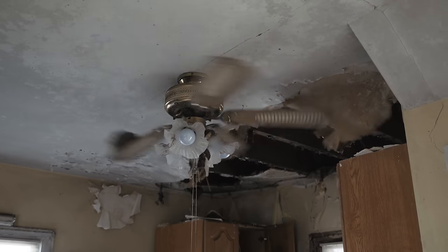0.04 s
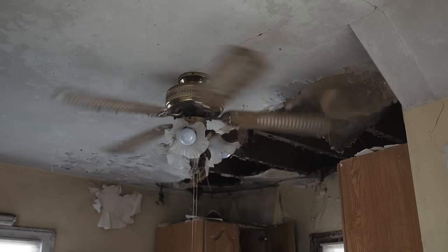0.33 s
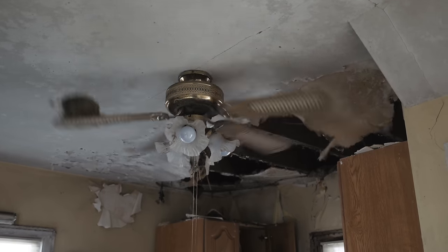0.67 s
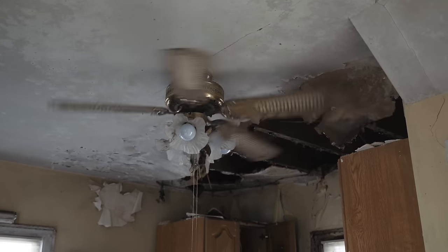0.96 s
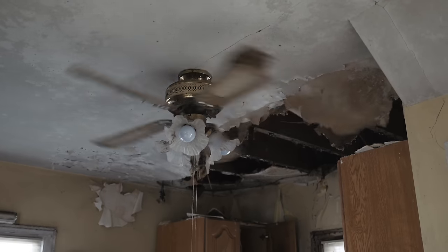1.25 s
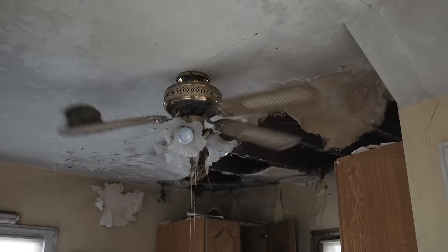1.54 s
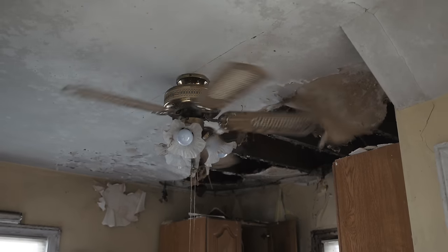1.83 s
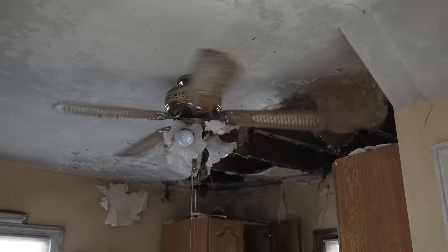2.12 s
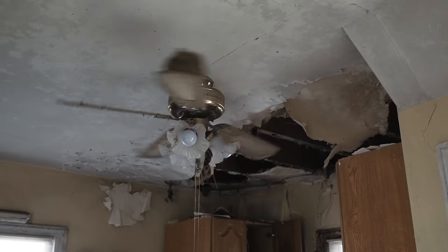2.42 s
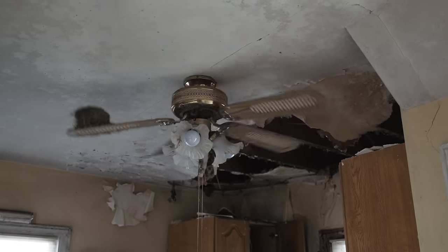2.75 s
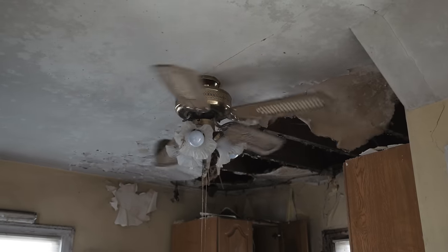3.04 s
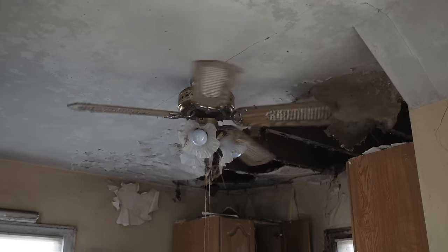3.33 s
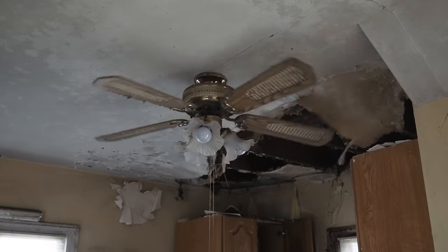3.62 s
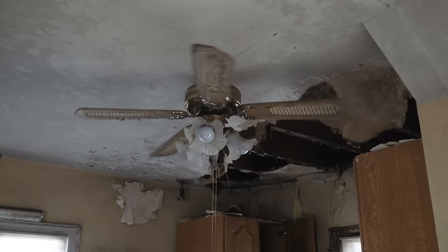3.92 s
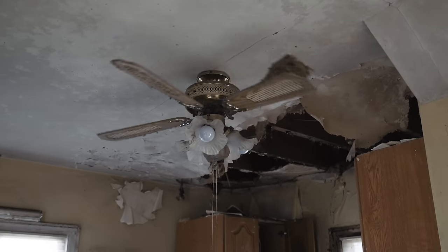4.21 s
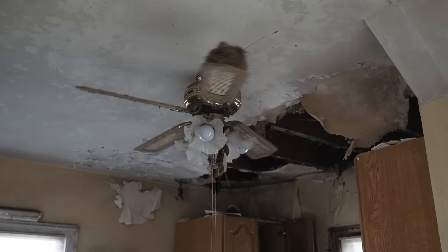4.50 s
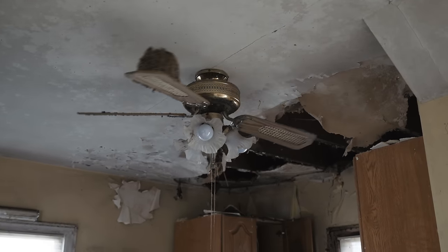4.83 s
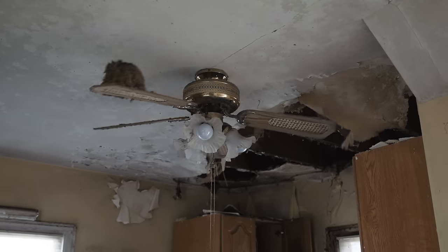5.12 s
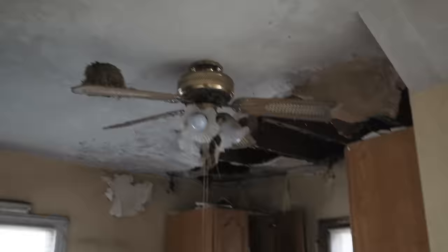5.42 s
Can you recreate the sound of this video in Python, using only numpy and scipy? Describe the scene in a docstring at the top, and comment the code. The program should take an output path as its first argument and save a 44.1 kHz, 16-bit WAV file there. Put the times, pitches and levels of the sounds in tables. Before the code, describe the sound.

A lopsided ceiling fan coasts down in a small room, its hollow knocks and gritty scuffs slowing and fading over a faint hum.

```python
"""A lopsided ceiling fan coasts to rest in a small bare room, its blades knocking as they pass.
Each knock is a hollow clack, a low thump and a gritty scuff that drags on longer as the fan slows.
Loose parts rattle, rub, tick and ring in between, and the last rubs squeak faintly.
A soft whirr sinks in pitch over a low rumble and hum, and everything stops abruptly near the end."""
import sys
import numpy as np
from scipy import signal
from scipy.fft import rfft, irfft
from scipy.io import wavfile
from scipy.ndimage import uniform_filter1d

SR = 44100
rng = np.random.default_rng(int(sys.argv[2]) if len(sys.argv) > 2 else 0)


def to_wav(s):
    """Save 16-bit WAV."""
    ch = np.atleast_2d(s).T  # columns
    pcm = np.round(np.clip(ch, -1, 1) * 32767)  # PCM
    wavfile.write(sys.argv[1], SR, pcm.astype(np.int16))


N = 249606
T = np.arange(N) / SR
AGE = np.arange(2 ** 15) / SR  # time within a one-shot, s
COAST_S, STOP_S = 5.54, 5.493  # length of the spin-down; start of the cut-off
THUMP_LAG_S, SCUFF_LAG_S = .003, .011
SWELL_S, DRAG_S = .0043, .028  # scuff attack and decay at full speed


def speed(s):
    """Share of full blade speed at time s: friction slows the fan evenly to a crawl."""
    return np.clip(1 - s / COAST_S, .03, 1)


# hollow body of the fan: f/Hz, width/Hz, gain/dB
BODY_MODES = [(229, 53, 15), (317.5, 20, 5.5), (430, 47, -1.5), (502, 25, 10.5), (564, 78, -0.5),
              (629, 85, 8), (678, 5.8, -1), (813, 17, -8), (919, 61, 6), (1176, 34, -4.5), (1298, 54, -2.5),
              (1515, 110, -1.5), (1579, 40, -2.5), (1730, 54, -1), (2100, 120, -3.5), (2395, 78, -4.5),
              (2810, 280, -6), (3290, 240, -7.5)]
# blade hits: t/s, body level/dB, crack level/dB, thump level/dB, scuff level/dB, clack f/Hz, thump f/Hz
BLADE_KNOCKS = [(0.001, -37.5, -42, -36, -70, 826, 110), (0.1076, -27, -28, -22.5, -50, 1070, 98),
                (0.268, -26, -31.5, -23.5, -31, 765, 143), (0.6976, -23.5, -27, -27, -59, 950, 140),
                (0.8346, -25.5, -30.5, -27.5, -45, 825, 115.4), (1.0011, -27.5, -35, -27, -32.5, 660, 147),
                (1.513, -27, -34.5, -34.5, -43, 890, 127), (1.702, -30.5, -31, -35.5, -42.5, 940, 130),
                (1.923, -32, -36, -30, -35.5, 700, 128), (2.179, -52, -44, -30.5, -44.5, 500, 107.6),
                (2.649, -38, -40, -37, -43, 1510, 144), (2.954, -38, -37, -35, -44, 850, 125),
                (3.289, -40.5, -43, -38, -36.5, 1160, 103), (3.718, -38.5, -57, -40.5, -46, 960, 134.6),
                (5.104, -55.5, -54.5, -50, -54, 600, 158)]


def knocks():
    """A blade strikes, thumps and drags past; slower blades give a less pitched clack, a longer scuff."""
    out = np.zeros((2, N))
    for s, body_db, crack_db, thump_db, scuff_db, hz, thump_hz in BLADE_KNOCKS:
        width_hz = np.interp(speed(s), [0, 1], [1400, 600])
        direct_db = -1.5 + .27 * (body_db + 25.5)  # softer knocks are wetter
        add(out, s, pan(strike(body_db, crack_db, hz, width_hz, direct_db, BODY_MODES), left_db=-1.5))
        add(out, s + THUMP_LAG_S, thump(thump_db, thump_hz))
        add(out, s + SCUFF_LAG_S, scuff(scuff_db, scuff_db + .5, SWELL_S / speed(s), DRAG_S / speed(s)))
    return out


# EQ of a hit's bright crack: f/Hz, gain/dB
CRACK_EQ = [(200, -27), (600, -0.5), (1800, 7.5), (3200, -0.5), (7000, 3), (11000, 0), (16000, -7)]


def strike(body_db, crack_db, hz, width_hz, direct_db, modes):
    """A contact gives a short clack and a bright crack; both ring the modes of the struck part."""
    push = ring(contact(direct_db), [(hz, width_hz, 0)])
    chatter = np.roll(push, int(rng.uniform(.001, .0028) * SR), axis=1)  # the parts meet once more
    clack = push + .35 * chatter
    body = level_attack(clack + undb(9.5) * ring(clack, modes))
    crack = colour(snap(direct_db - 4, decay_s=.003), CRACK_EQ)
    crack = level_attack(crack + ring(crack, modes))
    return undb(body_db) * body + undb(crack_db) * crack


def contact(direct_db, echo_db=-13, echo_s=.012):
    """One sharp impulse as it arrives: direct, off the nearest wall and from the whole room."""
    path = room_tail()
    path[:, 0] += undb(direct_db)
    path[0, int(echo_s * SR)] += undb(echo_db)
    path[1, int((echo_s + rng.uniform(-.0004, .0004)) * SR)] += undb(echo_db)
    return path


def snap(direct_db, decay_s):
    """Rough surfaces meet in a few milliseconds of grit, layered with a room tail."""
    grit = (rng.standard_normal(len(AGE)) + 2.4 * diffuse(len(AGE))) * np.exp(-AGE / decay_s)
    return room_tail() + undb(direct_db) * unit_energy(grit)


# low modes of the room: f/Hz, width/Hz, gain/dB
ROOM_MODES = [(75.5, 25, 7.5), (96.5, 12, 1), (143.3, 3.8, 8), (149.4, 4, -1), (213, 4.8, 1),
              (232.8, 29, 2), (260.4, 21, 6), (288.4, 2.1, -26.5)]


def thump(db, hz):
    """A heavy, quickly damped swing sets the low modes of the room booming."""
    swing = level_attack(np.sin(2 * np.pi * hz * AGE) * AGE * np.exp(-AGE / .0082))
    shudder = level_attack(ring(room_tail() * np.exp(-AGE / .16), [(168, 370, 0)]))
    boom = level_attack(ring(swing + undb(8) * shudder, ROOM_MODES))
    return undb(db) * level_attack(swing + undb(1.5) * boom + undb(-4) * shudder)


# EQs of friction, its bright hiss and its low rasp: f/Hz, gain/dB
HISS_EQ = [(500, -29.5), (1500, -8), (3000, -1), (5500, 2.5), (8500, 1), (12000, -2.5), (16000, -11)]
RASP_EQ = [(120, -4), (250, -11), (380, -4), (620, -6.5), (1000, -1), (1600, -0.5), (2400, -1.5),
           (4000, -10), (9000, -22)]


def scuff(hiss_db, rasp_db, swell_s, decay_s):
    """Rubbing swells and dies away: many tiny slips give a gritty hiss and a rasp in the hollow body."""
    pressure = np.minimum(AGE / swell_s, 1) * np.exp(-np.maximum(AGE - swell_s, 0) / decay_s)
    slip_db = 2.5 * rng.exponential(size=len(AGE) // 32).clip(0, 4)
    slips = unit_rms(uniform_filter1d(undb(slip_db).repeat(32), size=24))
    tilt = .16 * (hiss_db + 37)  # dB per octave: harder rubbing is brighter
    hiss = colour(diffuse(len(AGE)), [(hz, db + tilt * np.log2(hz / 4000)) for hz, db in HISS_EQ])
    spot_hz = np.geomspace(1000, 16000, 70)
    spot_db = 3 * rng.standard_normal(len(spot_hz))  # each rubbed spot has its own uneven colour
    hiss = unit_rms(colour(hiss, list(zip(spot_hz, spot_db))))
    rasp = colour(diffuse(len(AGE)), RASP_EQ)
    rasp = unit_rms(rasp + ring(rasp, BODY_MODES))
    rub = (undb(hiss_db) * hiss + undb(rasp_db) * rasp) * pressure * slips
    reverb = signal.fftconvolve(rub, room_tail(), axes=1)[:, :len(AGE)]
    return pan(rub + undb(-6.5) * reverb, left_db=-2)


# resonances of the loose parts: f/Hz, width/Hz, gain/dB
LOOSE_MODES = [(439, 60, 7), (548, 150, 3), (1198, 91, -2), (1300, 90, -6.5), (1580, 120, -4),
               (1800, 110, -6.5), (2485, 110, -9.5)]
# their hits: t/s, body level/dB, crack level/dB, f/Hz, pan left/dB
LOOSE_HITS = [(0.2733, -30, -49, 690, -3.5), (0.575, -40, -56.5, 1760, -8), (0.5796, -34, -64.5, 677, -4),
              (1.262, -29, -31.5, 1260, -0.5), (1.2644, -34.5, -27.5, 1330, 2)]


def rattles():
    """Loose parts click with a dry, narrow ring."""
    out = np.zeros((2, N))
    for s, body_db, crack_db, hz, left_db in LOOSE_HITS:
        click = strike(body_db, crack_db, hz, width_hz=.24 * hz, direct_db=3, modes=LOOSE_MODES)
        add(out, s, pan(click, left_db))
    return out


# grazes between the knocks: t/s, hiss level/dB, rasp level/dB, decay/s
GRAZES = [(0.324, -23, -26, 0.019), (0.423, -39, -33.5, 0.055), (0.466, -36, -61, 0.019),
          (0.551, -45, -45, 0.045), (0.66, -34, -38, 0.023), (0.847, -25.5, -27, 0.015),
          (0.972, -34, -32.5, 0.011), (1.061, -29.5, -31.5, 0.019), (1.172, -39, -34, 0.044),
          (1.222, -33.5, -46, 0.021), (2.04, -51.5, -51.5, 0.095), (2.136, -42.5, -40, .069),
          (2.196, -32.5, -38, 0.025), (2.71, -45.5, -44, .03), (3.01, -44.5, -41.5, 0.013),
          (3.38, -43, -42.5, 0.091), (3.464, -37, -45.5, .025), (3.49, -33.5, -41.5, 0.023),
          (3.83, -52, -45.5, 0.074), (5.21, -72, -52.5, 0.16), (5.42, -49.5, -56.5, 0.092)]


def rubs():
    """Parts graze each other without striking and give the fan a slight jolt."""
    out = np.zeros((2, N))
    for s, hiss_db, rasp_db, decay_s in GRAZES:
        add(out, s, scuff(hiss_db, rasp_db, SWELL_S / speed(s), decay_s))
        add(out, s + THUMP_LAG_S, thump(rasp_db - 9, hz=105))
    return out


# small contacts: t/s, level/dB
LIGHT_TICKS = [(0.231, -44.5), (1.651, -50), (1.810, -49.5), (2.029, -48), (2.325, -56), (2.368, -62),
               (2.496, -61.5), (2.806, -53.5), (3.158, -65), (4.805, -66), (5.067, -64)]


def ticks():
    """Light, bright clicks of grit between the knocks."""
    out = np.zeros((2, N))
    for s, db in LIGHT_TICKS:
        click = colour(snap(direct_db=4, decay_s=.004), HISS_EQ)
        add(out, s, undb(db) * level_attack(click))
    return out


# partials of loose metal: t/s, f/Hz, level/dB, t60/s
METAL_PARTIALS = [(1.066, 1986, -48, .55), (1.066, 2487, -48, .55), (1.263, 3165, -58, .7),
                  (1.263, 5093, -54, .8), (1.2615, 5400, -30, .035), (1.2635, 6050, -29, .04)]


def metal_rings():
    """Loose metal rings out in thin tones after two of the contacts."""
    out = np.zeros((2, N))
    for s, hz, db, t60 in METAL_PARTIALS:
        stereo_phase = rng.random((2, 1)) / 3
        tone = np.sqrt(2) * np.sin(2 * np.pi * (hz * AGE + stereo_phase))
        add(out, s, undb(db) * tone * decay(t60))
    return out


# whines in the last rubs: peak t/s, half length/s, f/Hz, filter width/Hz, level/dB
WHINES = [(5.223, 0.064, 3430, 200, -57.5), (5.278, 0.18, 1206, 80, -58)]


def squeaks():
    """Narrow whines of friction fade in and out."""
    out = np.zeros((2, N))
    for s, half_s, hz, width_hz, db in WHINES:
        band = [(hz, width_hz, 0)]
        whine = unit_rms(ring(ring(diffuse(N), band), band))
        out += undb(db) * whine * np.exp(-((T - s) / half_s) ** 2)
    return out


# automation of the blades' whirr: t/s, centre f/Hz, relative level/dB
WHIRR_CURVE = [(2.301, 1050, -66), (2.55, 960, -55.5), (3.199, 1020, -57.5), (3.6, 800, -65),
               (4.0, 560, -59), (4.301, 520, -56.5), (4.7, 450, -68.5), (5.5, 420, -72.5)]


def whirr():
    """A soft band of rushing noise sinks as the blades slow, over a broad wash of steady pitch."""
    s, hz, db = np.transpose(WHIRR_CURVE)
    lowpass = signal.butter(2, 210, fs=SR, output="sos")  # sets the band's half width
    flutter = signal.sosfilt(lowpass, diffuse(N) + 1j * diffuse(N) + rng.standard_normal(N))
    carrier = np.exp(2j * np.pi * np.cumsum(np.interp(T, s, hz)) / SR)
    band = unit_rms(np.real(flutter * carrier))
    wash = unit_rms(ring(diffuse(N), [(1040, 1000, 0)]))
    return (band + undb(-4) * wash) * undb(np.interp(T, s, db) - 1.5)


# EQ of the air bed: f/Hz, gain/dB
AIR_EQ = [(12, -51), (20, -4.5), (31, -23), (53, -2.5), (177, -18), (270, -14.5), (337, -24), (377, -18),
          (422, -21.5), (485, -19.5), (574, -24.5), (1710, -25.5), (2820, -32), (4060, -32.5),
          (16000, -37.5)]


def air_and_hum():
    """A bed of low rumble and thin hiss with a faint wavering hum; both fade as the fan slows."""
    air = unit_rms(colour(diffuse(N), AIR_EQ)) * undb(-54 + 10.5 * speed(T) ** 2)
    hum = unit_rms(ring(diffuse(N), [(144.6, 4, 0)])) * undb(-76.5 + 25 * speed(T))
    return air + hum


# reverb time of the room: f/Hz, t60/s
ROOM_DECAY = [(150, 0.51), (420, 0.23), (1100, 0.2), (3000, 0.25), (8000, 0.2), (16000, 0.18)]


def room_tail():
    """Diffuse reverb tail of unit energy; the bass lasts longest."""
    spectrum = rfft(diffuse(len(AGE)))
    tail = np.zeros((2, len(AGE)))
    for centre_hz, t60 in ROOM_DECAY:
        crossover = [(hz, float(hz == centre_hz)) for hz, _ in ROOM_DECAY]
        tail += irfft(spectrum * along(crossover, bins(AGE))) * decay(t60)
    build_up = 1 - np.exp(-AGE / .0015)
    return unit_energy(tail * build_up)


# stereo image of the room: f/Hz, left-right correlation/0-1
CORRELATION = [(60, 1), (150, 0.99), (300, 0.95), (550, 0.67), (1100, 0.46), (2200, 0.21), (8000, 0.2)]


def diffuse(size):
    """Stereo noise from all around: mono in the bass, wide in the treble."""
    noise = rng.standard_normal((2, size))
    alike = along(CORRELATION, bins(noise))
    mid, side = irfft(rfft(noise) * np.sqrt([1 + alike, 1 - alike]), size)
    return unit_rms(np.array([mid + side, mid - side]))


def colour(x, points):
    """Minimum-phase EQ through (f/Hz, gain/dB) points."""
    size = x.shape[-1]
    cepstrum = irfft(np.log(undb(along(points, bins(x)))), size)
    cepstrum[1:size // 2] *= 2
    cepstrum[size // 2 + 1:] = 0
    return irfft(rfft(x) * np.exp(rfft(cepstrum)), size)


def ring(x, modes):
    """Pass x through parallel (f/Hz, width/Hz, gain/dB) resonators."""
    f = bins(x)
    response = sum(undb(db) * 1j * f * width / (hz ** 2 - f ** 2 + 1j * f * width)
                   for hz, width, db in modes)
    return irfft(rfft(x) * response, x.shape[-1])


def along(points, hz):
    """Read (f/Hz, value) points on a log-frequency axis."""
    f, value = np.transpose(points)
    return np.interp(np.log(np.maximum(hz, 1)), np.log(f), value)


def bins(x):
    """Frequencies of the spectrum of x."""
    return np.fft.rfftfreq(x.shape[-1], 1 / SR)


def undb(db):
    """Decibels to gain."""
    return 10 ** (np.asarray(db) / 20)


def decay(t60):
    """Envelope that falls 60 dB in t60 seconds."""
    return np.exp(-np.log(1000) * AGE / t60)


def unit_rms(x):
    """Scale to rms 1."""
    return x / np.sqrt(np.mean(x ** 2))


def unit_energy(x):
    """Scale a stereo sound to a mean energy of 1 per channel."""
    return x / np.sqrt(np.sum(x ** 2) / 2)


def level_attack(x):
    """Scale so that the first 30 ms have rms 1."""
    return x / np.sqrt(np.mean(x[..., AGE < .03] ** 2))


def pan(x, left_db):
    """Lean a sound to the left by so many dB."""
    return x * undb(np.array([[left_db], [-left_db]]) / 2)


def add(out, s, sound):
    """Mix a one-shot in at time s, fading its far end."""
    start = int(s * SR)
    fade = np.interp(AGE, [.5, .7], [1, 0])
    out[:, start:start + len(AGE)] += (sound * fade)[..., :N - start]


def scene():
    """The knocking fan, its loose parts and the bed beneath them."""
    return knocks() + rattles() + rubs() + ticks() + metal_rings() + squeaks() + whirr() + air_and_hum()


def record(dry):
    """A gate shuts abruptly at the end; a steep low-pass trims the very top."""
    gate = np.clip((STOP_S - T) / .005 + 1, undb(-50), 1)
    lowpass = signal.ellip(10, .2, 80, 16100, fs=SR, output="sos")
    return signal.sosfilt(lowpass, dry * gate)


dry = scene()
out = record(dry)
to_wav(out)
```